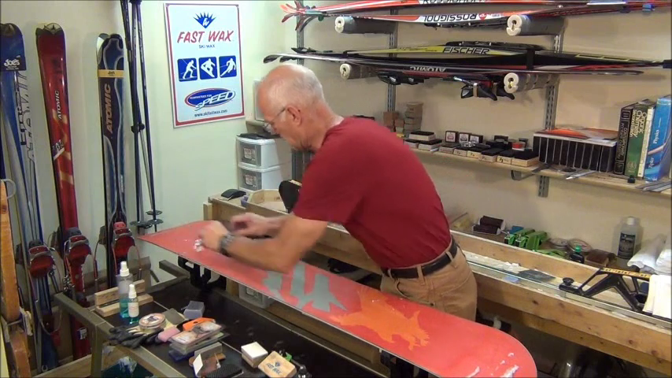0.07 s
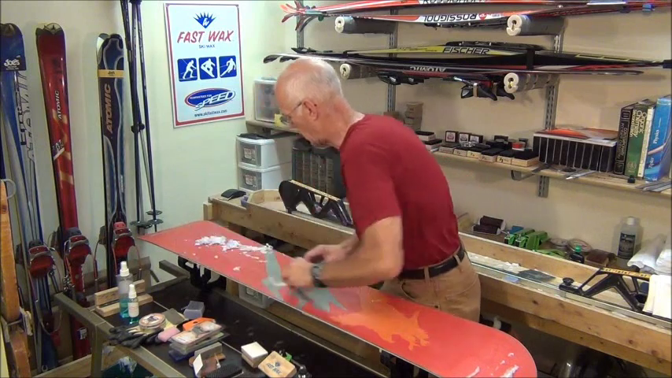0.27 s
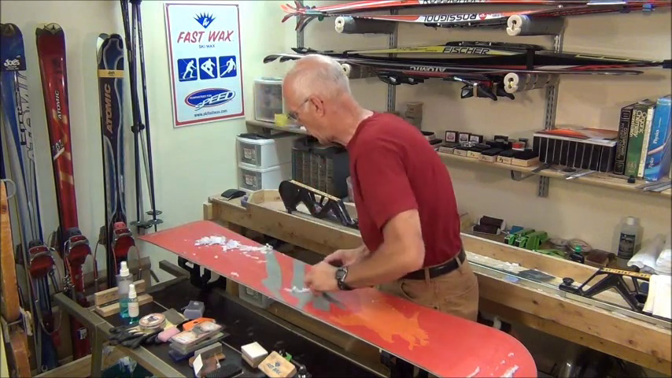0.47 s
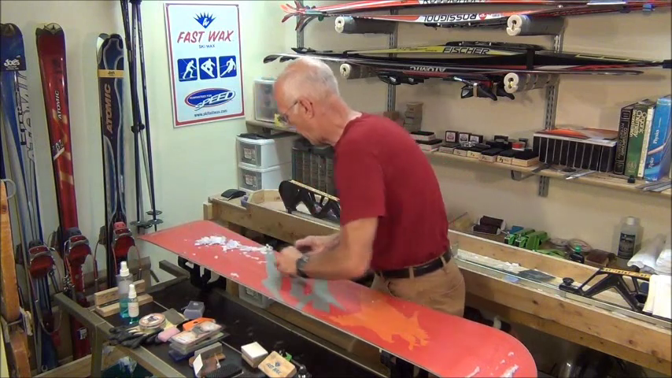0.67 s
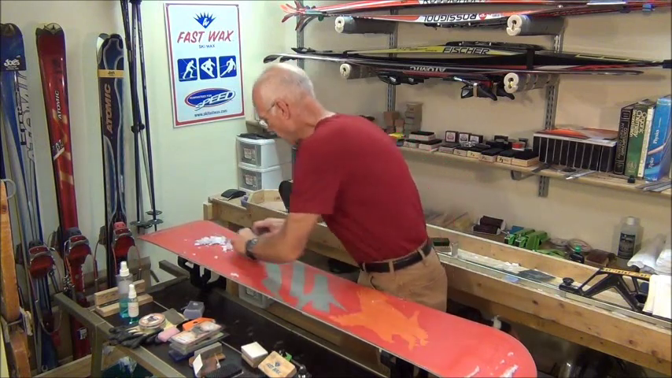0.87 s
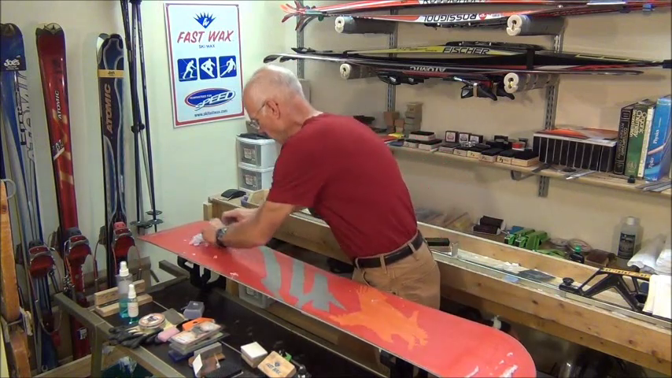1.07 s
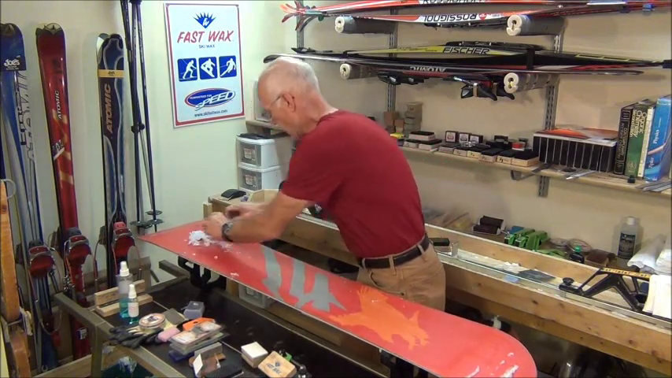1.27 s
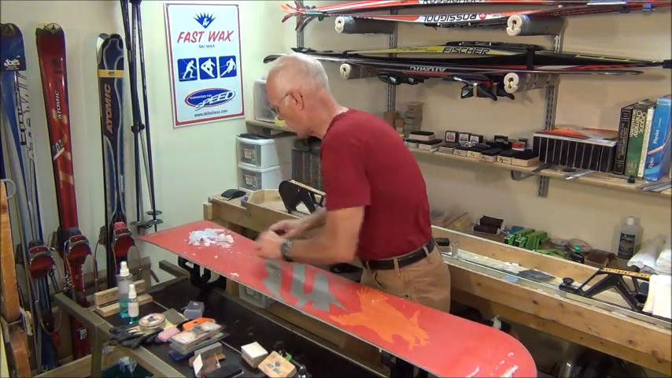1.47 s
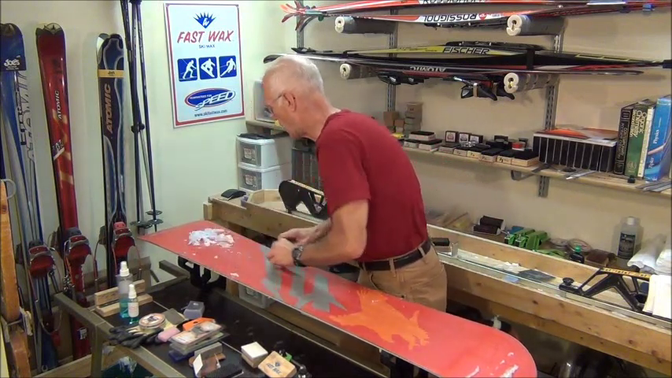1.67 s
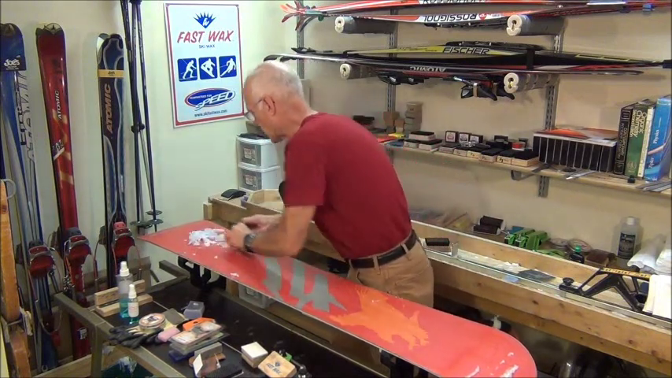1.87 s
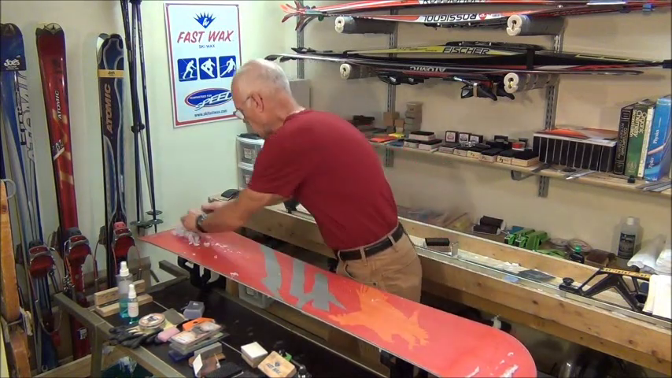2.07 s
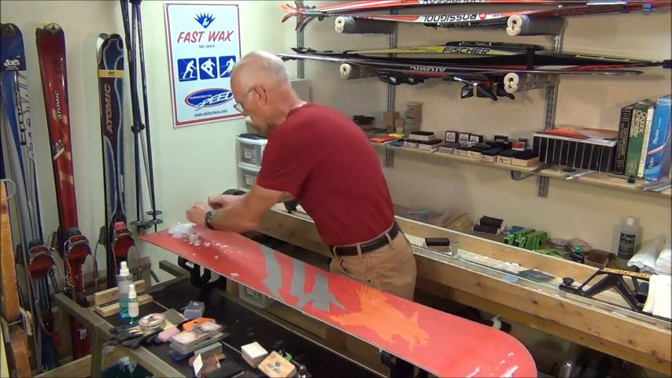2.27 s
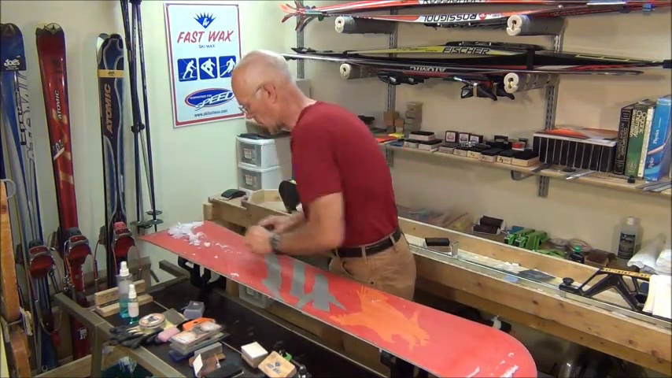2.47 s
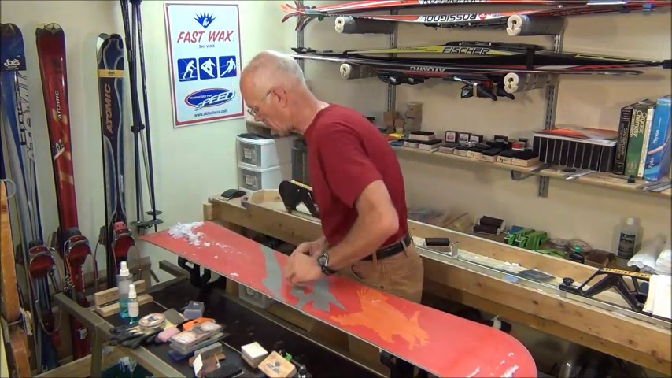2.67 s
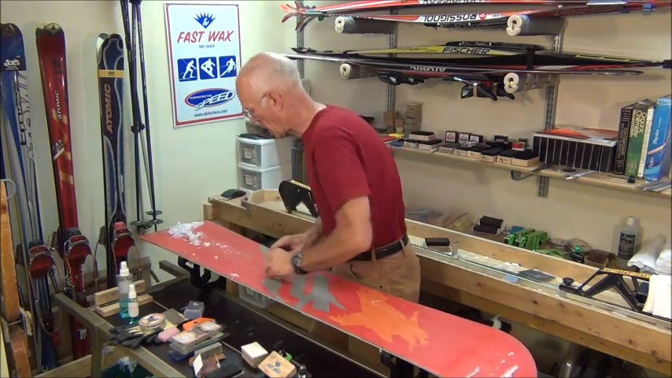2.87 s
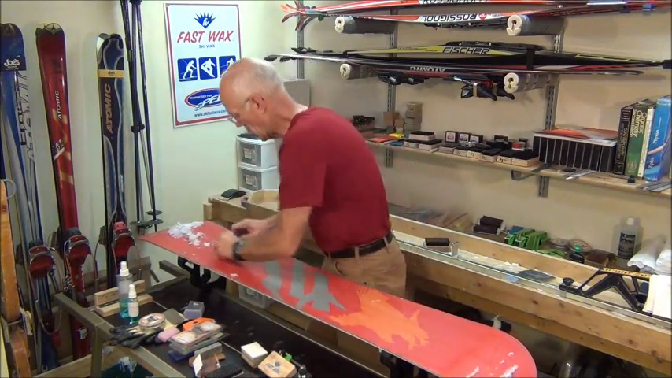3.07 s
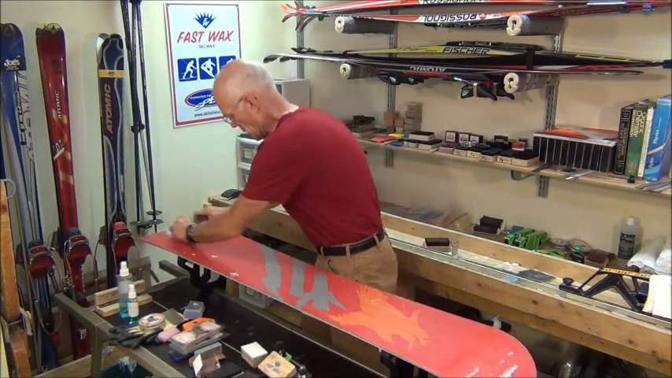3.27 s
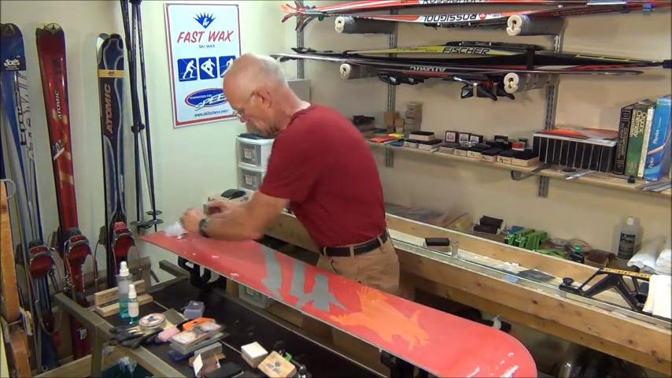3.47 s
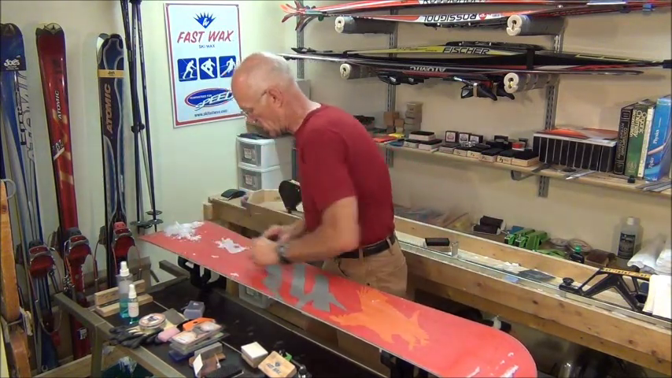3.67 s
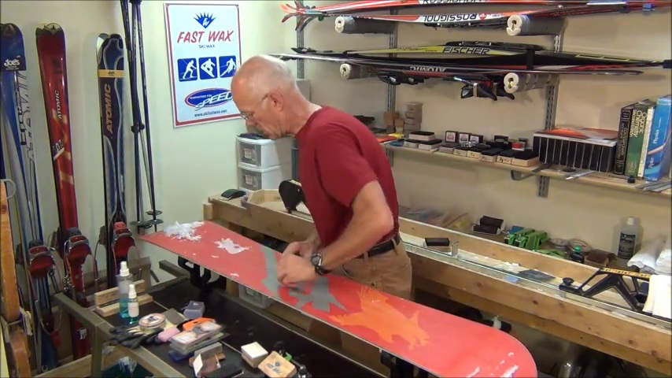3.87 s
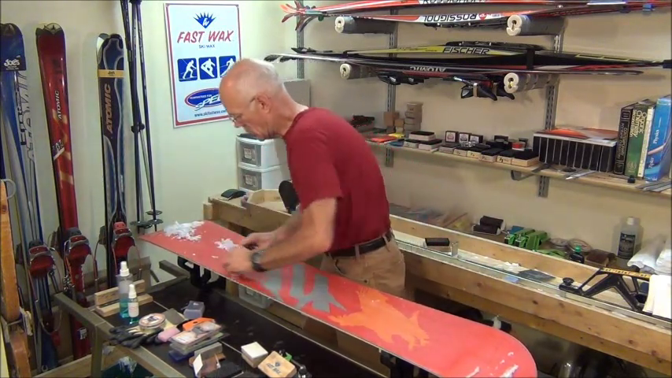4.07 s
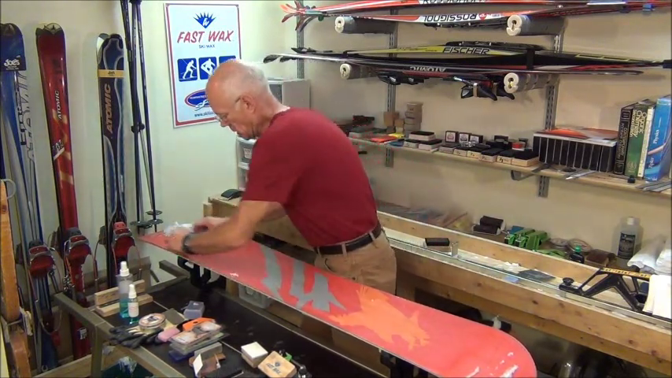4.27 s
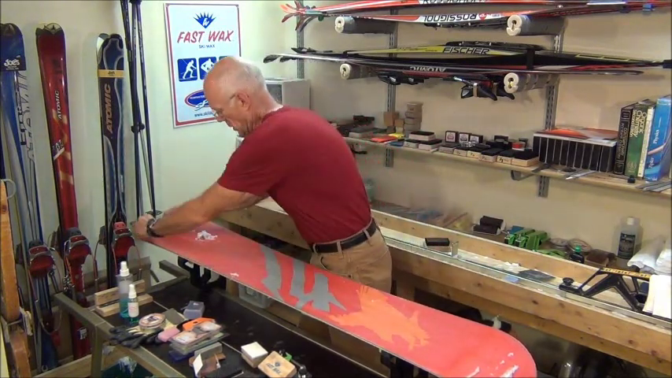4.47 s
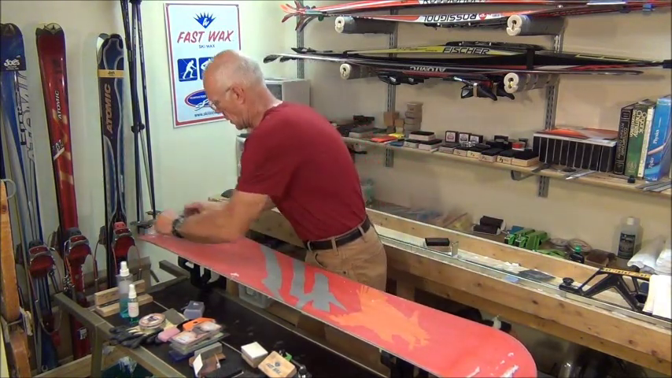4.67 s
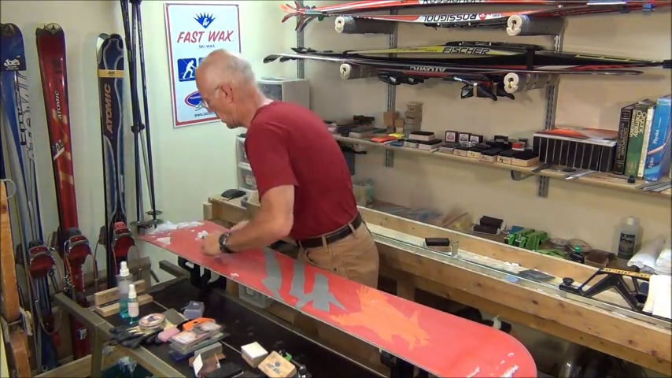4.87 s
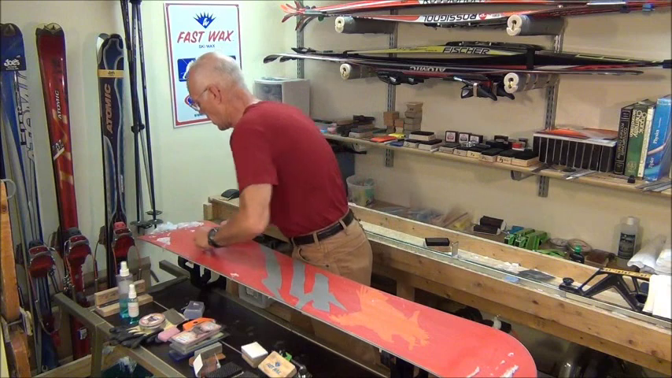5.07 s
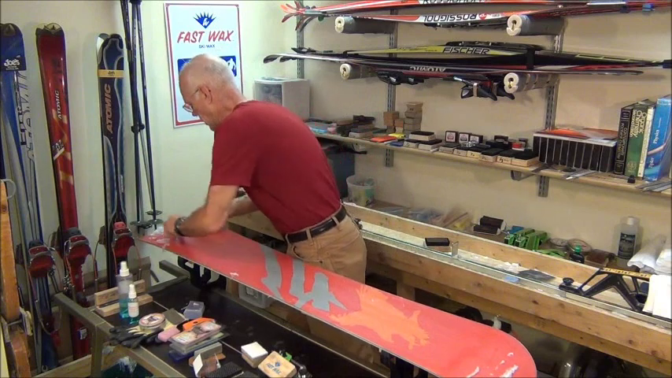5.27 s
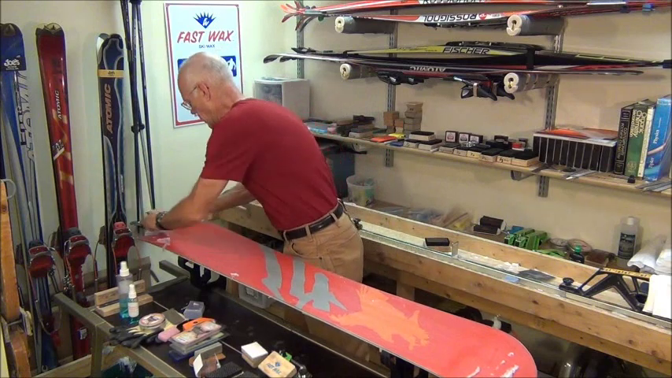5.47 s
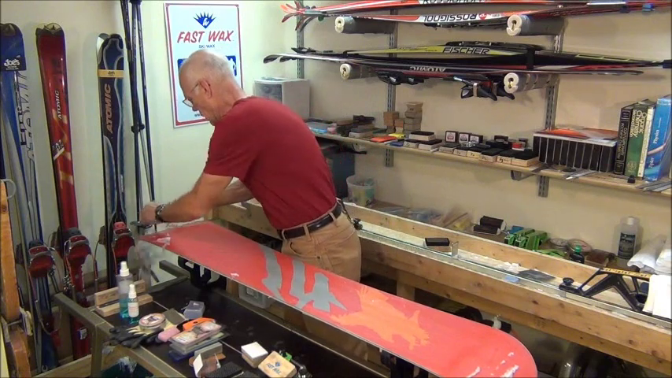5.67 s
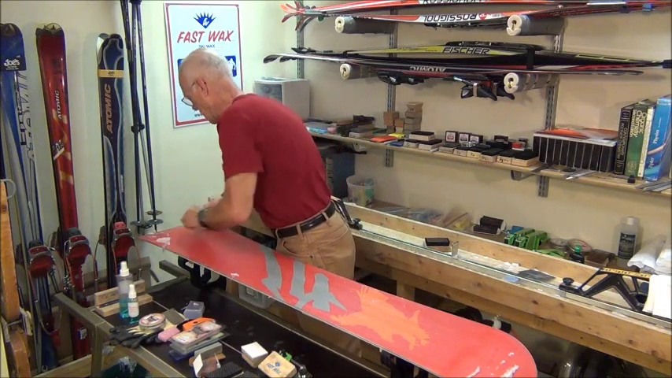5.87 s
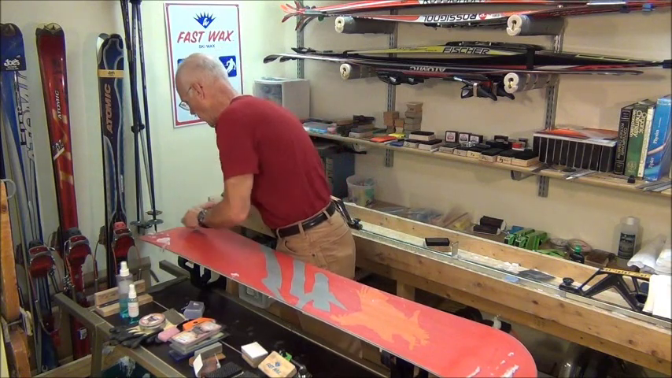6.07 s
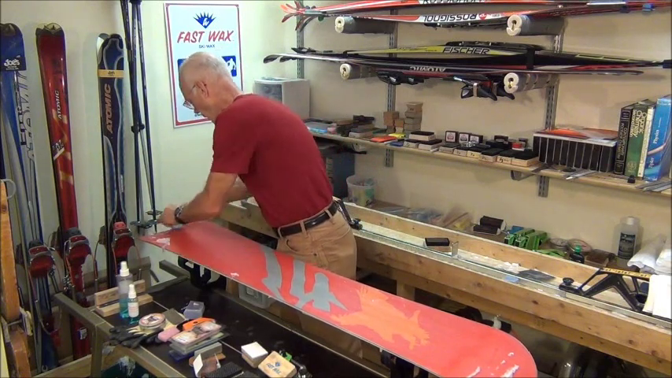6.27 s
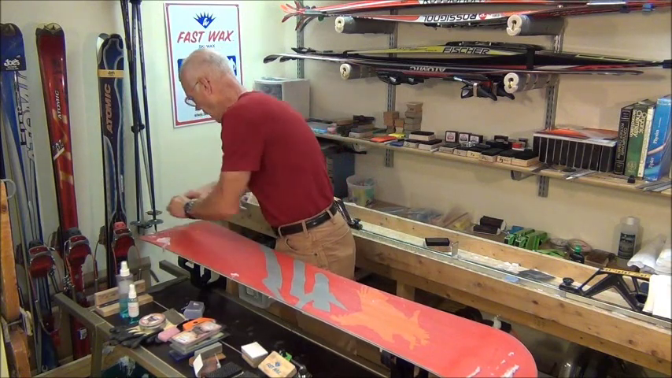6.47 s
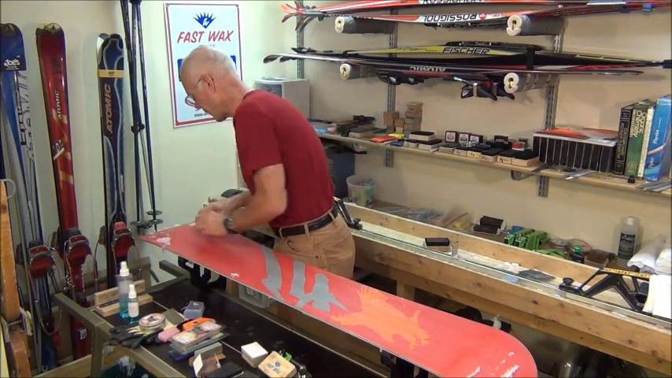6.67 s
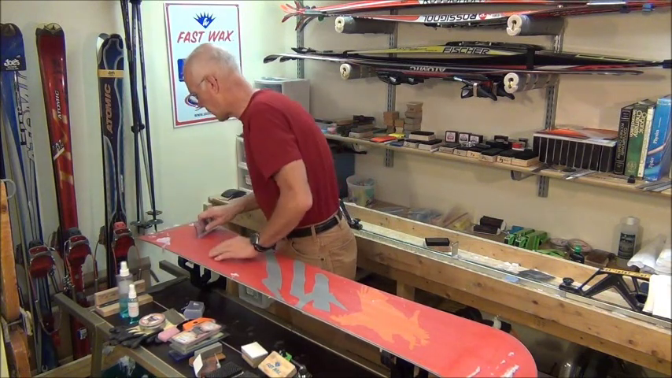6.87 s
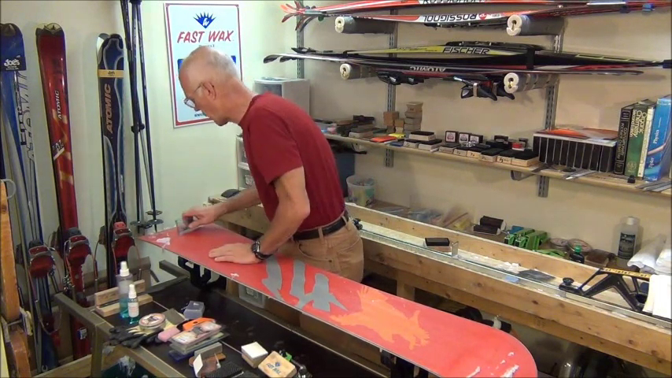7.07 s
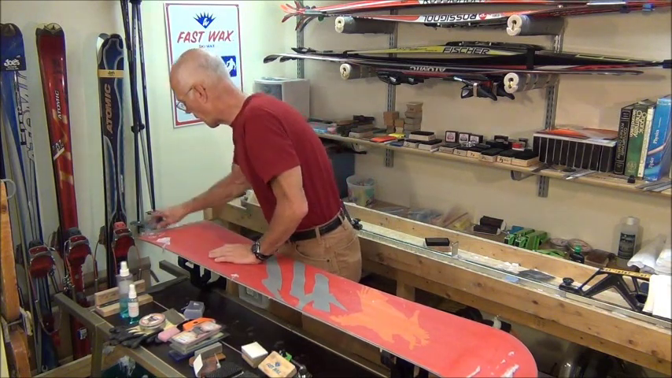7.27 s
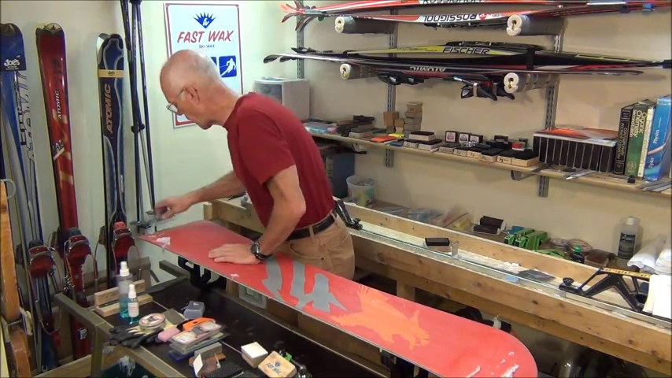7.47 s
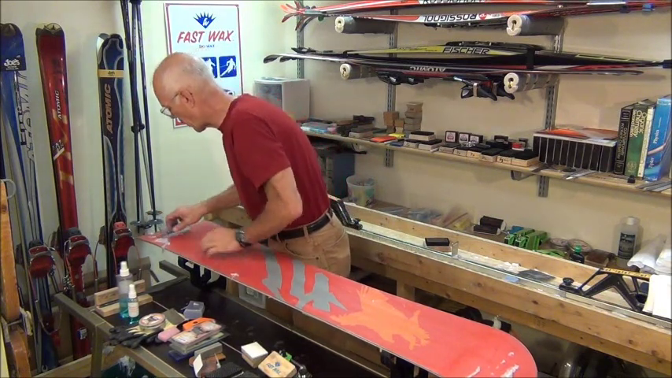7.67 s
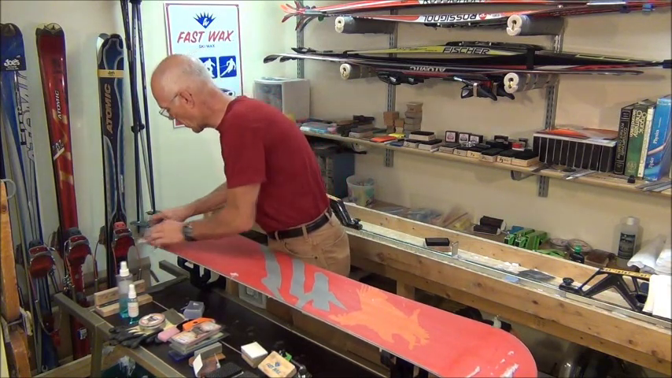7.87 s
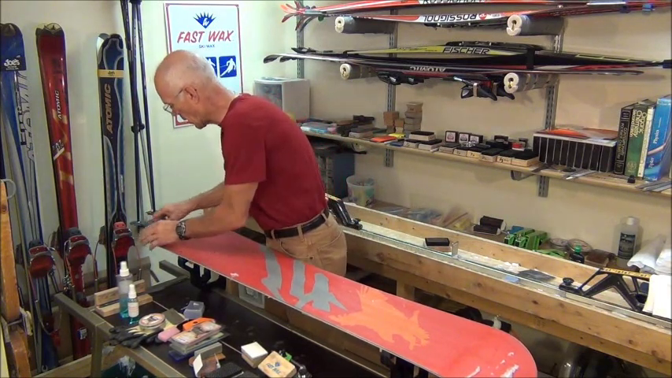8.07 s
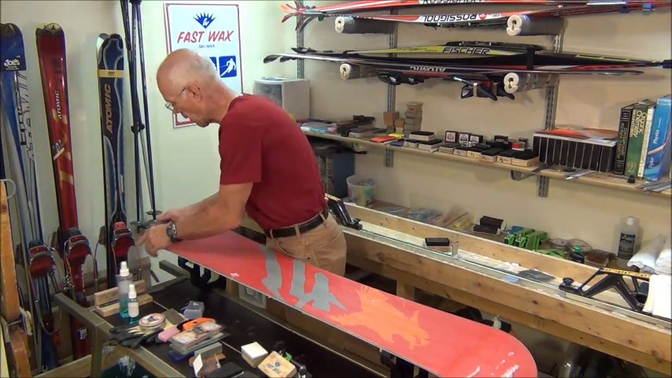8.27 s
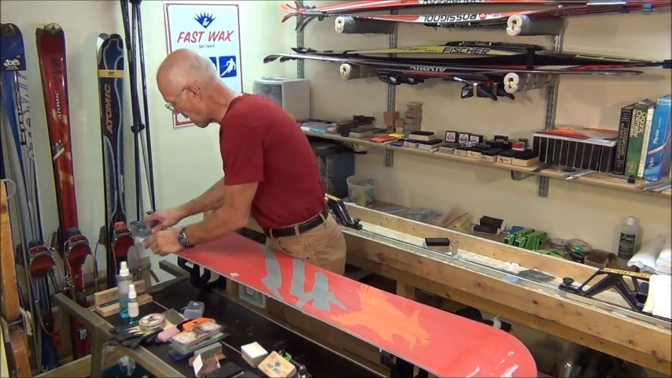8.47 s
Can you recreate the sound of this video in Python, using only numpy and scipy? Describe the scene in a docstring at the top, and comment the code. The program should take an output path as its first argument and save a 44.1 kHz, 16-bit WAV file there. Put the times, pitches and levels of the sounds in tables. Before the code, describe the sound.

Brisk scraping strokes, bright and grainy with a raspy edge, run along a resonant board. Woody clacks and dull thuds punctuate the gaps, and the clamped board shudders and groans softly. After five long passes, the work turns to brief scrapes, stuttering skips over the end and scattered knocks. The stereo pickup is fairly close in a small room with short diffuse reflections and a quiet background.

```python
"""A hard plastic scraper takes the wax off a snowboard clamped on a bench, heard in stereo in a small workshop.
The wax breaks away in a dense hiss of tiny random fractures, with the blade's ring and the rasp of its edge.
Knocks of blade and hands ring the board's modes; twice the blade chatters over the board's end.
The board shudders, bumps and groans in its vices, a short diffuse room answers every contact,
and behind it all lie still air, made of coloured noise, and a distant motor, made of wavering sines."""
import sys
import numpy as np
from scipy import signal
from scipy.fft import rfft, irfft, next_fast_len
from scipy.io import wavfile

SR = 44100
rng = np.random.default_rng(int(sys.argv[2]) if len(sys.argv) > 2 else 0)


def int16_out(signal):
    """Quantize to a 16-bit WAV file."""
    q = np.round(np.clip(np.atleast_2d(signal).T, -1, 1) * 32767)
    wavfile.write(sys.argv[1], SR, q.astype(np.int16))


N = 375291
TIME = np.arange(N) / SR  # s

# Still air of the workshop. Each row: frequency in Hz, relative level in dB.
AIR = [(30, -36), (60, -1), (110, -10), (195, -13.5), (245, -8), (330, -13), (750, -8.5), (1700, -13.5),
       (2080, -13.5), (2600, -14), (5000, -19), (14000, -22), (16000, -39)]
AIR_DB = -54.2  # rms of its mid
# A distant motor. Each row: frequency in Hz, rms level in dB.
HUM = [(121, -71), (242, -58.5), (2040, -67), (2159, -70)]

# Decay of the room. Each row: frequency in Hz, reverberation time in s.
ROOM_T60 = [(100, 0.12), (400, 0.43), (1500, 0.3249), (5000, 0.1457), (14000, 0.1421)]
# Stereo width of the echoes and the air. Each row: frequency in Hz, side minus mid in dB.
ROOM_SIDE = [(60, -35), (125, -23), (270, -19.5), (600, -13.5), (1100, -10.5), (2500, -8), (6000, -7.5),
             (13000, -11.5)]

# Modes of the board. Each row: frequency in Hz, width in Hz, gain in dB.
BOARD = [(293.1, 10.3, 15.5), (411, 30, 6.5), (590, 43, 5), (807, 48, 7), (913, 60, -1), (1045, 9.3, 6.5),
         (1165, 33, 5.5), (1238, 47, 9.5), (1378, 41, 2), (1476, 25, 4), (1575, 23, 3), (1980, 17, -12),
         (2520, 56, -15), (2860, 29, -2)]
BOARD_WASH_DB = 2  # its many weaker modes, merged
# Force that shakes the clamped board. Each row: frequency in Hz, relative level in dB.
SHAKE = [(25, -28), (50, -9.5), (80, 6.5), (125, -3), (155, -3.5), (195, -14.5), (290, -13), (450, -18.5),
         (900, -27.5)]
# Board rocking in its vices as the weight on it shifts.
# Each row: time of the height in s, half length in s, level in dB.
LURCHES = [(0.08, 0.047, -37), (0.706, 0.07, -36.5), (1.098, 0.04, -37), (2.33, 0.05, -39),
           (2.55, 0.03, -43), (3.01, 0.07, -39), (3.36, 0.1, -39.5), (4.48, 0.03, -45), (4.95, 0.04, -45),
           (5.43, 0.05, -34), (5.926, 0.045, -36), (6.26, 0.067, -44), (6.67, 0.055, -36),
           (7.16, 0.03, -34), (7.29, 0.05, -41), (8.003, 0.06, -43.5), (8.286, 0.045, -35)]
TREMBLE_DB, TREMBLE_SWAY_DB = -53.5, 1.5  # the board's steady trembling under the hands
JOLT_DB, JOLT_S = -19, 0.097  # shudder after a knock, relative to the weight behind it, and its decay
# Board bumping on its supports. Each row: start in seconds, level in dB.
THUMPS = [(6.598, -33), (7.138, -34), (7.156, -37.5)]
# Board rubbing in a vice. Each row: start in seconds, end in seconds, level in dB, slips per second.
GROANS = [(2.077, 2.196, -31, 85), (7.964, 8.067, -30, 83)]

# Blade skipping over the board's end.
# Each row: start in seconds, end in seconds, level in dB, skips per second, tone centre in Hz.
CHATTER = [(5.43, 5.52, -17, 260, 1280), (7.192, 7.267, -10.5, 220, 1110)]
# Blade and hands meeting the base; each level is relative to the trim of its layer. Each row: start in
# seconds, woody body in dB, hard clack in dB, weight of the hands behind it in dB.
KNOCKS = [(0.046, -40, -42.5, -36), (0.074, -31, -34, -41), (0.349, -29.5, -38.5, -34),
          (0.359, -19, -25, -28.5), (0.64, -38, -60, -31), (1.074, -28.5, -32.5, -32),
          (1.41, -56, -66, -39.5), (1.514, -10.5, -10.5, -27), (2.206, -30, -31, -37),
          (2.344, -24.5, -32, -33), (2.53, -44, -45, -46), (2.626, -8, -12.5, -17.5),
          (3.464, -33, -34, -35), (3.755, -17.5, -25.5, -24.5), (4.862, -17.5, -23.5, -28),
          (5.377, -21, -20.5, -37), (5.427, -10.5, -11.5, -34), (5.451, -17.5, -15, -26),
          (5.862, -16.5, -24, -20.5), (6.591, -27, -41, -29.5), (6.658, -19.5, -28.5, -26.5),
          (6.77, -30, -39.5, -27), (7.137, -20.5, -31, -40), (7.165, -14.5, -12, -36), (7.5, -35, -47, -45),
          (7.61, -22, -35, -26), (7.644, -29, -34, -27), (8.234, -9, -9, -18), (8.268, -14, -26, -21)]
CLICK_DB, CLICK_GROWTH = -26, 0.68  # the plastic's click behind a 0 dB clack, and its dB per dB of clack
# Bright plastic clicks, most of them together with a knock. Each row: start in seconds, level in dB.
TICKS = [(2.345, -45), (2.528, -46), (3.620, -36), (3.757, -39), (5.862, -39)]

# Passes of the blade, the faint ones brushing back over loose flakes; levels are relative to the layer trims.
# Each row: start in s, at full speed in s, starts to slow in s, hiss of breaking wax in dB, ring of the blade
# in dB, rasp of the edge in dB, hiss lost by the end as the wax runs thin in dB, rasp gained by the end as the
# edge drags in dB.
STROKES = [(0.0, 0.07, 0.34, -55, -63, -56, 0, 0), (0.408, 0.497, 0.993, -18.7, -23.2, -27.7, 2.3, 4),
           (1.578, 1.662, 2.012, -19, -26.2, -25.5, 6.5, 0.5), (2.24, 2.3, 2.39, -59, -66, -54, 0, 0),
           (2.686, 2.776, 3.203, -18, -25, -29.5, 1.5, 4.7),
           (3.799, 3.884, 4.346, -17.8, -24.4, -32, 5.3, 8.5),
           (4.888, 4.981, 5.335, -18.5, -23.2, -30.5, 5.8, 5), (5.43, 5.48, 5.493, -33.5, -29, -24, 0, 0),
           (5.862, 5.89, 5.92, -34.5, -42, -43, 0, 0), (5.95, 6.025, 6.05, -26.5, -32, -35, 0, 0),
           (6.04, 6.135, 6.228, -19.7, -24.8, -29.5, 4, 7.5), (6.45, 6.6, 6.82, -59, -63, -59, 0, 0),
           (6.823, 6.928, 6.975, -29.5, -35.5, -32.7, 0, 0),
           (6.96, 7.095, 7.115, -21.7, -26.7, -26.3, 0, 0), (7.165, 7.235, 7.263, -31, -29.5, -23.5, 0, 0),
           (7.68, 7.775, 7.782, -30.3, -31, -30.5, 0, 0), (8.233, 8.243, 8.255, -45, -34, -42, 0, 0),
           (8.275, 8.345, 8.354, -25.5, -26, -28.7, 0, 0)]
# Wax breaking at the blade. Each row: frequency in Hz, relative level in dB.
HISS = [(2500, -39.5), (5500, -16), (7600, -7), (8700, -2), (9700, 0.5), (10700, -2.8), (11800, -2.5),
        (13100, -6), (14300, -10), (16000, -11.5)]
# Broad resonance of the plastic blade. Each row: frequency in Hz, relative level in dB.
BLADE = [(2000, -30.5), (4350, -5), (5000, -1), (5700, -2.5), (6800, -4.5), (8500, -6), (14000, -22.5)]
# Edge dragging on the base. Each row: frequency in Hz, relative level in dB.
RASP = [(190, -26.5), (300, -16), (700, -9), (1200, -7), (1700, -2.5), (2100, 1.5), (2700, -0.5),
        (3450, 1.5), (4200, -4), (7000, -10), (15000, -34)]
# Swell with the push: the edge rasps before wax breaks. One power each for hiss, blade and rasp.
SWELL_POWERS = [1.95, 1.45, 0.8]
# Fade as the blade slows. One rate in dB per s each for hiss, blade and rasp.
FADES_DB_PER_S = [258, 200, 186]
THINNING_CURVE = 3.2  # the wax thins as this power of the way along the pass
BITE_DB, BITE_S = 4, 0.051  # blade and rasp are louder while the edge first digs in: boost, hold and decay
BRAKE_SHARE = 0.1  # braking eases in over this share of the pass
CREEP_DB, CREEP_S = -17, 0.03  # creep around the push-off: push relative to full, half length

LEFT_DB = 0.54  # left channel over right
TOP_HZ = 15850


def undb(db):
    """Decibels to gain."""
    return 10 ** (np.asarray(db) / 20)


def unit(x):
    """Scale to rms 1."""
    return x / np.sqrt(np.mean(x ** 2) + 1e-20)


def on_log_axis(points, size):
    """A table over frequency, interpolated on a log axis at the bins of a transform."""
    hz, value = np.transpose(points)
    bins_hz = np.fft.rfftfreq(size, 1 / SR)
    return np.interp(np.log(bins_hz + 1), np.log(hz), value)


def colour(x, points, size=4096):
    """Causal minimum-phase filter with the given (Hz, dB) response, by folding its cepstrum."""
    cepstrum = irfft(np.log(undb(on_log_axis(points, size))))
    cepstrum[1:size // 2] *= 2
    cepstrum[size // 2 + 1:] = 0
    response = irfft(np.exp(rfft(cepstrum)))
    return signal.fftconvolve(x, response)[:len(x)]


def cut(x, hz, kind, order):
    """Butterworth low-pass or high-pass."""
    sections = signal.butter(order, min(hz, SR / 2 - 1), kind, fs=SR, output="sos")
    return signal.sosfilt(sections, x + 1e-18)


def walk(rate):
    """Random wander through rate new values per second, with a spread near 1."""
    return np.interp(TIME * rate, np.arange(N // 10), rng.standard_normal(N // 10))


def grains(rate, spread_db):
    """Random clicks of uneven size and either sign, rate per second."""
    present = rng.random(N) < rate / SR
    sign = rng.choice([-1, 1], N)
    size = undb(spread_db * rng.standard_normal(N))
    return unit(present * sign * size)


def slips(seconds, rate, jitter, spread_db, size=26000, count=64):
    """A short run of stick-slip pulses, uneven in period and strength."""
    gap, strength = rng.standard_normal((count, 2)).T
    periods = np.exp(jitter * gap) / rate
    times = np.cumsum(periods) - periods[0]
    keep = times < seconds
    return np.bincount((times[keep] * SR).astype(int), undb(spread_db * strength[keep]), size)


def workshop(direct_db, early_db, early_s, size=24576):
    """Stereo response: direct sound, sparse echoes of bench and shelves, then a short diffuse tail."""
    t = np.arange(size) / SR
    sparse = rng.standard_normal((2, size)) * (rng.random((2, size)) < 1 / 100) * 10
    early = undb(early_db) * sparse * np.exp(-t / early_s)
    echoes = rfft(rng.standard_normal((2, size)) + early)
    tail = 0
    for k, (_, t60) in enumerate(ROOM_T60):
        # each band takes its share of the echoes and decays at its own rate
        share = on_log_axis([(hz, j == k) for j, (hz, _) in enumerate(ROOM_T60)], size)
        tail = tail + irfft(echoes * share) * np.exp(-np.log(1000) * t / t60)
    mid, side = (unit(part) / np.sqrt(size) for part in tail)
    mid = mid + undb(direct_db) * (t == 0)
    side = colour(side, ROOM_SIDE)
    return np.array([mid + side, mid - side]) / np.linalg.norm(mid)


def heard(x, room):
    """A sound on the bench as it reaches the two microphones."""
    return signal.fftconvolve(x[None], room, axes=1)[:, :len(x)]


def burst(x, room, db):
    """A short sound in the room, with the energy of the given level held for 30 ms."""
    wet = heard(x, room)
    energy = np.sum(np.mean(wet ** 2, axis=0))
    return wet * undb(db) * np.sqrt(.03 * SR / energy)


def add(out, s, sound):
    """Mix a sound in at time s."""
    start = max(round(s * SR), 0)
    out[:, start:start + sound.shape[1]] += sound[:, :N - start]


def scattered(x, spots, size=200):
    """A wide sliding blade: every size samples the sound crossfades to another spot with its own echoes."""
    step, within = np.divmod(np.arange(N), size)
    place = np.cumsum(rng.integers(1, len(spots), size=N // size + 2)) % len(spots)
    angle = np.pi / 2 * within / size
    leaving, arriving = x * np.cos(angle), x * np.sin(angle)
    now, later = place[step], place[step + 1]
    length = next_fast_len(N + spots[0].shape[1], True)
    spectrum = 0
    for k, room in enumerate(spots):
        at_spot = leaving * (now == k) + arriving * (later == k)
        spectrum = spectrum + rfft(at_spot, length) * rfft(room, length)
    return irfft(spectrum, length)[:, :N]


def board(force):
    """A force at the blade rings the board's modes, which stand out of a dense wash."""
    rings = 0
    for hz, width, db in BOARD:
        rings = rings + undb(db) * signal.lfilter(*signal.iirpeak(hz, hz / width, SR), force + 1e-18)
    return rings + undb(BOARD_WASH_DB) * force


def contact(force, low_hz, high_hz):
    """The band of the board's response that a contact excites."""
    return cut(cut(force, high_hz, "low", order=4), low_hz, "high", order=4)


def background():
    """Still room air as wide coloured noise, with a faint motor hum of sines that waver in phase."""
    mid, side = (unit(colour(rng.standard_normal(N), AIR)) for _ in range(2))
    side = colour(side, ROOM_SIDE)
    hum = 0
    for hz, db in HUM:
        phase = 2 * np.pi * hz * TIME + 0.74 * walk(13)
        hum = hum + undb(db) * np.sqrt(2) * np.sin(phase)
    return undb(AIR_DB) * np.array([mid + side, mid - side]) + hum


def shudder():
    """How hard the board shakes: a steady tremble, a jolt from every knock and a swell for every lurch."""
    power = undb(TREMBLE_DB + TREMBLE_SWAY_DB * walk(6.4)) ** 2
    for s, _, _, weight_db in KNOCKS:
        decay = (TIME > s) * np.exp(-np.abs(TIME - s) / JOLT_S)
        power += (undb(weight_db + JOLT_DB) * decay) ** 2
    for s, half_s, db in LURCHES:
        power += undb(db) ** 2 * np.exp(-((TIME - s) / half_s) ** 2)
    return np.sqrt(power)


def vices(spots, groan_t60=0.76, size=26000):
    """The clamped board shudders under the hands, bumps on its supports and groans by stick-slip in a vice."""
    shaking = board(colour(grains(rate=420, spread_db=4), SHAKE))
    out = shudder() * unit(heard(shaking, spots[0]))
    t = np.arange(size) / SR
    for room, (start, db) in zip(spots, THUMPS):
        bump = cut(cut(1. * (t == 0), 115, "low", order=3), 46, "high", order=3)
        add(out, start, burst(bump, room, db))
    for start, end, db, rate in GROANS:
        # the slips weaken as the board settles; its slow flexing reaches both microphones alike
        settling = np.exp(-np.log(1000) * t / groan_t60)
        force = slips(end - start, rate, jitter=0.052, spread_db=5.5) * settling
        flex = signal.lfilter(*signal.iirpeak(rate, 4, SR), cut(force, 120, "low", order=2))
        add(out, start, burst(flex, np.ones((2, 1)), db))
    return out


def chatter(spots):
    """The blade skips over the board's end, each skip a small blow that rings the board."""
    out = np.zeros((2, N))
    for room, (start, end, db, rate, hz) in zip(spots, CHATTER):
        ringing = board(slips(end - start, rate, jitter=.5, spread_db=1.5))
        add(out, start, burst(contact(ringing, 0.61 * hz, 1.39 * hz), room, db))
    return out


def knocks(spots, body_db=-3.5, weight_db=-1, clack_db=0, settle=.22, settle_s=.012,
           reach_hz=2600, db_per_octave=70, size=26000):
    """The blade lands and rattles to rest; a harder landing reaches higher modes and clicks louder."""
    out, t = np.zeros((2, N)), np.arange(size) / SR
    plastic_tone = [(1200, -9.5), (3500, 3), (6000, -1.5), (11000, -4.5), (16000, -19)]  # (Hz, dB)
    for k, (s, body, clack, weight) in enumerate(KNOCKS):
        room = spots[k % len(spots)]
        rattle = rng.standard_normal(size) * (rng.random(size) < 1 / 20) * np.exp(-t / settle_s)
        ring = board((t == 0) + settle * rattle)
        highest_hz = reach_hz * 2 ** (clack / db_per_octave)
        add(out, s, burst(contact(ring, 258, 480), room, weight + weight_db))
        add(out, s, burst(contact(ring, 512, 1140), room, body + body_db))
        add(out, s, burst(contact(ring, 843, highest_hz), room, clack + clack_db))
        plastic = colour((t == 0) + 0.11 * rattle, plastic_tone)
        add(out, s, burst(plastic, room, CLICK_DB + CLICK_GROWTH * clack))
    return out


def plastic_clicks(spots, size=26000):
    """Bright plastic clicks, most of them together with a knock: single high-passed impulses in the room."""
    out, impulse = np.zeros((2, N)), 1. * (np.arange(size) == 0)
    for room, (s, db) in zip(spots, TICKS):
        add(out, s, burst(cut(impulse, 7000, "high", order=3), room, db))
    return out


def stroke(start, full, slows, hiss_db, blade_db, rasp_db, thin_db, drag_db):
    """Gains of hiss, blade and rasp over one pass: the blade creeps, speeds up, bites, runs out of wax and slows."""
    t, length = TIME - start, slows - start
    creep = undb(CREEP_DB) * np.exp(-(t / CREEP_S) ** 2)
    push = np.maximum(np.clip(t / (full - start), 0, 1), creep)
    ease = BRAKE_SHARE * length
    braking_s = np.hypot(np.maximum(t - length, 0), ease) - ease
    bare = np.clip(t / length, 0, 1) ** THINNING_CURVE
    bite = BITE_DB * np.exp(-np.maximum(t - BITE_S, 0) / BITE_S)
    levels = [hiss_db - thin_db * bare, blade_db + bite, rasp_db + bite + drag_db * bare]
    return np.array([push ** power * undb(db - fade * braking_s)
                     for db, power, fade in zip(levels, SWELL_POWERS, FADES_DB_PER_S)])


def scraping(spots, hiss_db=1.0, blade_db=1, rasp_db=-0.5, board_share=0.26, grip_db=2):
    """Wax breaks in thousands of tiny fractures; the edge's uneven grip flutters hiss, blade and rasp together."""
    gains = sum(stroke(*row) for row in STROKES)
    grip = undb(grip_db * walk(400))
    hiss = unit(colour(grains(rate=20000, spread_db=4.0) * grip, HISS))
    blade = unit(colour(grains(rate=12000, spread_db=4.0) * grip, BLADE))
    drag = colour(grains(rate=6000, spread_db=2.5) * grip, RASP)
    rasp = unit(unit(drag) + board_share * unit(board(drag)))
    layers = np.array([undb(hiss_db) * hiss, undb(blade_db) * blade, undb(rasp_db) * rasp])
    return scattered(np.sum(gains * layers, axis=0), spots)


def scene(count=12):
    """Each spot along the board has its own echoes in the same room."""
    spots = [workshop(direct_db=-11.5, early_db=-4.5, early_s=0.017) for _ in range(count)]
    contacts = chatter(spots) + knocks(spots) + plastic_clicks(spots)
    return background() + vices(spots) + contacts + scraping(spots)


def record(dry):
    """The highest peaks are rounded, the left channel is a little stronger and the top is cut."""
    rounded = dry / (1 + dry ** 4) ** (1 / 4)
    balance = undb(np.array([[LEFT_DB], [-LEFT_DB]]) / 2)
    top_cut = signal.ellip(10, .2, 80, TOP_HZ, fs=SR, output="sos")
    return signal.sosfilt(top_cut, rounded * balance)


dry = scene()
out = record(dry)
int16_out(out)
```